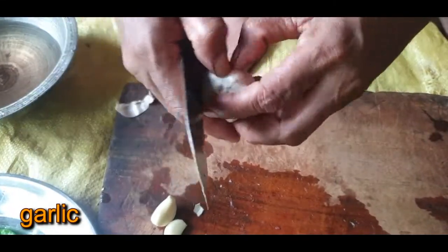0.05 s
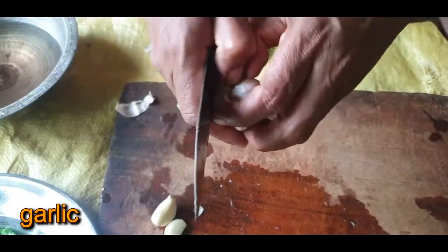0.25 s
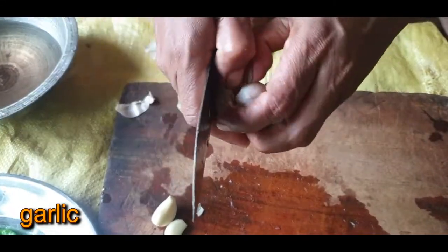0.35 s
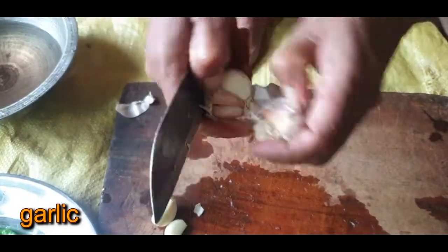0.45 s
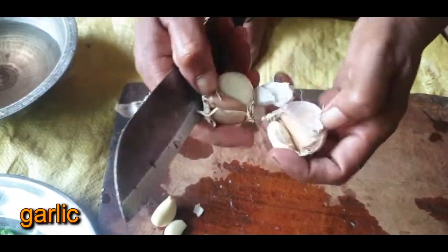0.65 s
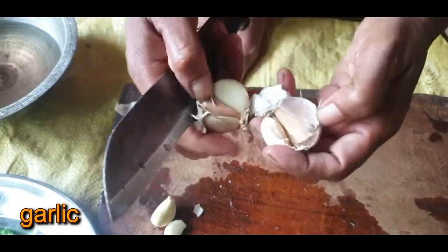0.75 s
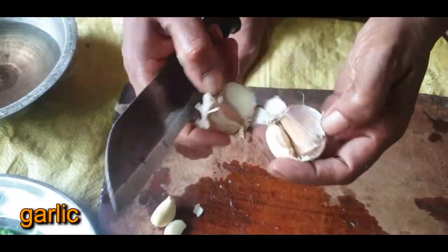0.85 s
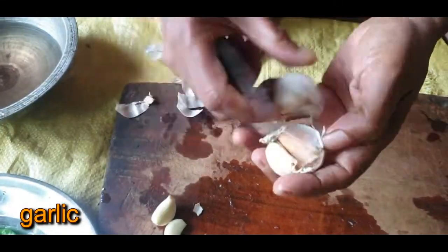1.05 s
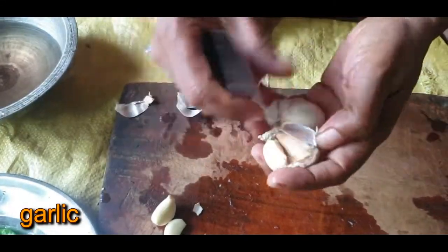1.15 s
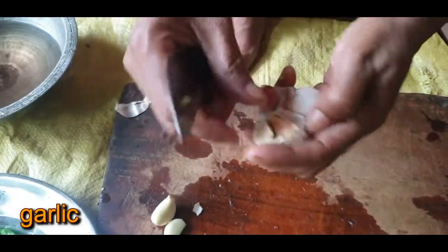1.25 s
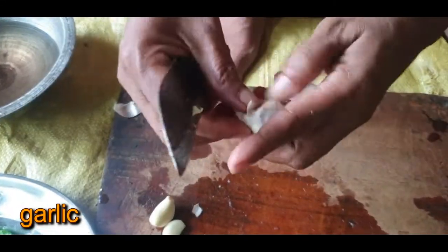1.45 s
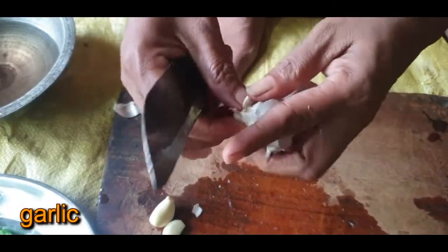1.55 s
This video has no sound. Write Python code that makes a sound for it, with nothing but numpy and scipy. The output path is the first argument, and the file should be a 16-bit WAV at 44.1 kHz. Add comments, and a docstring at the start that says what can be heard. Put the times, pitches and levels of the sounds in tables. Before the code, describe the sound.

A garlic bulb is prised apart by hand, close by in a small quiet kitchen. A few dry snaps build to a sharp, tearing crackle, then fingers softly rub and tick on the papery skin.

```python
"""A garlic bulb is prised apart by hand over a chopping board, close by in a small kitchen.
Dry skin and stem snap a few times, then the bulb gives way: fibres tear in a crackle and the woody
core knocks. Before and after, fingers rub and tick on the papery skin. The board and hands scatter
each crack, the room rings briefly, and a low hum and faint tones lie underneath."""
import sys
import numpy as np
from scipy import signal
from scipy.fft import rfft, irfft
from scipy.io import wavfile
from scipy.ndimage import uniform_filter1d

SR = 44100
rng = np.random.default_rng(int(sys.argv[2]) if len(sys.argv) > 2 else 0)


def dump_mix(stems):
    """Bounce the given channels to the path in sys.argv[1] as a 16-bit WAV at rate SR."""
    frames = np.atleast_2d(stems).T  # one column per channel
    limited = np.clip(frames, -1, 1)  # hard clip at full scale
    pcm = np.round(limited * 32767).astype(np.int16)
    wavfile.write(sys.argv[1], SR, pcm)


N = 70560
T = np.arange(N) / SR

# Tone colour of the kitchen air and of the low rumble. Each row: frequency in Hz, level in dB.
AIR_COLOUR = [(20, -45), (45, -2), (100, -2), (250, -12), (550, -12.5), (900, -21), (1800, -20.5),
              (3800, -15.5), (6000, -23), (7700, -32), (11500, -21), (16000, -36)]
RUMBLE_COLOUR = [(20, -39), (48, 2), (110, -5), (175, -3.5), (260, -13.5), (600, -24.5), (1500, -53),
                 (16000, -104)]
# How wide the air sounds. Each row: frequency in Hz, level of the sides against the middle in dB.
AIR_WIDTH = [(80, -10.5), (400, -3.5), (3000, 1.5)]
# Faint wavering tones. Each row: pitch in Hz, width in Hz, relative level in dB.
FAINT_TONES = [(560, 85, -2), (906, 99, -3.5), (1052, 110, -7.5), (1419, 54, -5)]
# How the hum, the tones and a thin whistle rise and fall. Each row: time in seconds, level in dB.
HUM_LEVELS = [(0, -54), (.12, -62.5), (.23, -55.5), (.33, -59.5), (.48, -57.5), (.58, -69), (.68, -62.5),
              (.93, -64), (1.01, -64.5), (1.13, -57.5), (1.42, -82.5), (1.53, -69)]
TONE_LEVELS = [(0, -86), (.12, -66.5), (.35, -69), (.7, -94), (1.1, -82.5), (1.6, -75)]
WHISTLE_LEVELS = [(0, -74), (.1, -60.5), (.18, -74), (.63, -64), (.72, -82), (.9, -65), (.98, -86)]
# Skin sliding under the fingers. Each row: peak time, rise and fall in seconds, level in dB,
# treble in dB, centre of the rasp in Hz.
FINGER_RUBS = [(.003, 0.023, 0.027, -47.5, -9.5, 4830), (0.1, 0.02, 0.031, -45.5, -1.5, 6500),
               (0.211, 0.04, 0.093, -50, 2, 6300), (.82, 0.9, 0.15, -60.5, -7, 3670),
               (0.997, 0.041, 0.03, -44, 3, 5800), (1.051, 0.0074, 0.011, -54.5, 11, 5100),
               (1.176, 0.018, 0.064, -55, 5, 5370), (1.251, 0.011, 0.028, -52.5, 5, 8700),
               (1.271, 0.017, 0.018, -43.5, -6.5, 10800), (1.296, 0.017, 0.011, -43.5, -3, 9250),
               (1.346, 0.041, 0.034, -44.5, -2.5, 3900), (1.486, 0.022, 0.021, -45, -2, 4700),
               (1.516, 0.014, 0.015, -49, -1, 5270), (1.59, 0.036, 0.1, -50, 2.5, 6260)]
# Small ticks of dry skin. Each row: start in seconds, level in dB, treble in dB.
SKIN_TICKS = [(.0048, -41.5, 5), (.0098, -42, 0), (0.036, -52, 10), (0.0732, -41.5, 2.5), (0.099, -43, 11),
              (0.267, -40, -8), (0.8429, -55.5, 4), (1.0495, -56, 8), (1.1537, -53, 5), (1.25, -46.5, 13),
              (1.2732, -49, 15), (1.298, -50.5, 18), (1.433, -55.5, 9.5), (1.4832, -52, -3),
              (1.5399, -43, 5.5), (1.586, -40.5, 7)]
# Loud snaps of stem and skin. Each row: start in seconds, level, bass and treble in dB, splinter fade
# in milliseconds, left over right in dB, ring of the broken piece in Hz, its boost in dB, top end in dB.
STEM_SNAPS = [(.2424, -15, 5, 4, 1, 1.5, 3650, 8.5, 2.5), (.3626, -7, -4, -14.5, 0.09, -1, 4050, 6, 3),
              (.3924, -17, 0, 3.5, 0.51, 0.5, 5960, 12.5, -12),
              (.4122, -15.5, -5, -6.5, 0.15, -1, 4040, 7.5, -6),
              (.4322, -22.5, -5, 10, 0.29, 3, 6400, 9.5, 2), (.4515, -29, 1, -5, 0.57, -3.5, 5780, 14, -3),
              (.5065, -35.5, 1, 2, 0.8, 7, 5570, -13, 14), (.5199, -27.5, -15, 2.5, 0.47, 1, 6260, -6, 10),
              (.5272, -26, -7, -10, 0.5, 10, 3600, 7, 13), (.5358, -7.5, -3, -12, 0.56, -1, 3040, 7, 11),
              (.5375, -11, -10.5, -4.5, 0.4, 1, 2300, 18, -17),
              (.5403, -4, -5.5, -11.5, 0.45, 0.5, 3500, 6, -0.5),
              (.5484, -17.5, 0, -21, .6, -9, 5600, 8, 14), (.5537, -25.5, -6, 2, .4, 5, 5260, 10, 17),
              (.5653, -18, 12, -0.5, 0.35, 3.5, 6600, 8, -6)]
# Runs of tearing fibres. Each row: peak time, rise and fall in seconds, level, bass and treble in dB.
FIBRE_TEARS = [(0.243, 0.011, 0.043, -36.5, 10.5, -1.5), (.364, 0.0085, 0.033, -38, 3, -2),
               (0.497, 0.0031, 0.017, -32.5, -14, -10.5), (0.525, 0.011, 0.022, -23.5, -7, -3),
               (0.543, 0.021, 0.023, -25.5, 2.5, -8.5), (0.565, 0.036, 0.02, -31.5, 2, 4),
               (0.611, 0.027, 0.011, -35.5, -23, -6)]
# Tone colour of rubbed skin and of a crack in the bulb. Each row: frequency in Hz, level in dB.
SKIN_COLOUR = [(200, -13), (900, -13.5), (2000, -8.5), (3700, -5), (5700, 1.5), (7700, -5.5), (10500, 3),
               (14000, -1.5), (16000, 4)]
CRACK_COLOUR = [(150, -37.5), (620, -35), (1200, -22), (2700, -11.5), (3400, -5), (4500, -0.5), (6200, -3),
                (7900, -9.5), (9200, -4.5), (10800, 0), (14000, -0.5), (16000, -10.5)]
# How the garlic's sound leans to one side. Each row: frequency in Hz, left over right in dB.
SIDE_LEAN = [(1000, 2), (2400, 1), (3400, 8), (4500, -4.5), (8000, 0), (15000, 0)]
# Hollow knocks of the woody core. Each row: start in seconds, level in dB.
CORE_KNOCKS = [(.537, -33.5), (.5645, -27.5)]
# The notes the core rings at. Each row: pitch in Hz, relative level in dB, seconds to fade by 60 dB.
CORE_NOTES = [(348, -16, 0.022), (970, -4, 0.016), (1563, 4, 0.0081), (1870, 1, 0.0069),
              (2196, 7.5, 0.0093)]

BASS_HZ, TREBLE_HZ, TOP_END_HZ = 2700, 7300, 13300
SPLINTER_SHARE, SCATTER_DB, SCATTER_FADE_S, SCATTER_DELAY_S = 0.36, -4, 0.0026, 0.0005
RIGHT_LAG_MS, LAG_SPREAD_MS, SKIN_PAN_DB = 0.056, 0.03, 1.5
OPPOSITE_SIDES = np.array([[1], [-1]])


def gain(db):
    """Turn decibels into a number to multiply by."""
    return 10 ** (np.asarray(db) / 20)


def unit(x):
    """Scale a sound to an average power of 1."""
    return x / np.sqrt(np.mean(x ** 2))


def pan(db):
    """Left and right gains that make the left louder by db."""
    return gain(OPPOSITE_SIDES * db / 2)


def colour(points, hz):
    """Read a table's decibels at the given frequencies."""
    table_hz, db = np.array(points).T
    return np.interp(np.log(hz + 1), np.log(table_hz), db)


def bass_treble(hz, bass_db, treble_db):
    """Decibels added by a bass and a treble control."""
    return bass_db / (1 + (hz / BASS_HZ) ** 6) + treble_db * (1 - 1 / (1 + (hz / TREBLE_HZ) ** 8))


def bump(hz, centre_hz, width_hz):
    """The shape of a resonance, 1 at its centre."""
    return 1 / (1 + (2 * (hz - centre_hz) / width_hz) ** 2)


def shape(x, db):
    """Boost or cut each frequency so that any ringing follows the sound (a minimum-phase filter)."""
    cepstrum = irfft(db * np.log(10) / 20)
    half = cepstrum.shape[-1] // 2
    cepstrum[..., 1:half] *= 2
    cepstrum[..., half + 1:] = 0
    return irfft(rfft(x) * np.exp(rfft(cepstrum)))


def garlic_tone(x, points, bass_db, treble_db):
    """Give a plain sound the garlic's tone colour and its lean to either side."""
    hz = np.fft.rfftfreq(x.shape[-1], 1 / SR)
    db = colour(points, hz)
    db -= 10 * np.log10(np.mean(gain(db) ** 2))
    lean_db = OPPOSITE_SIDES * colour(SIDE_LEAN, hz) / 2
    return shape(x, db + bass_treble(hz, bass_db, treble_db) + lean_db)


def add(out, x, start_s):
    """Mix a short sound in at the given time."""
    i = max(0, min(int(start_s * SR), N - 1))
    out[:, i:i + x.shape[1]] += x[:, :N - i]


def grains(per_s, spread_db):
    """A stream of tiny breaks of uneven size, partly alike on both sides."""
    sizes = gain(spread_db * np.minimum(rng.exponential(size=N), 5))
    happens = rng.random(N) < per_s / SR
    x = sizes * happens * (rng.standard_normal((2, N)) + 0.46 * rng.standard_normal(N))
    return x / np.sqrt(uniform_filter1d(x ** 2, size=500, axis=1) + 1e-9)


def swell(peak_s, rise_s, fall_s):
    """Pressure that builds to a peak and lets go."""
    return np.exp(-2 * (abs(T - peak_s) / np.where(T < peak_s, rise_s, fall_s)) ** 1.44)


def background():
    """Room air, a wavering hum with its rumble, faint tones and a whistle, all filtered noise."""
    hz = np.fft.rfftfreq(N, 1 / SR)
    noise = lambda weights: unit(irfft(rfft(rng.standard_normal(N)) * weights))
    narrow = lambda centre_hz, width_hz: noise(bump(hz, centre_hz, width_hz))
    broad = lambda points: noise(gain(colour(points, hz)))
    level = lambda rows: gain(np.interp(T, *np.array(rows).T))
    middle = broad(AIR_COLOUR)
    sides = shape(broad(AIR_COLOUR), colour(AIR_WIDTH, hz)) * OPPOSITE_SIDES
    air = gain(-63.5) * (middle + sides)
    hum = (narrow(centre_hz=77, width_hz=10) + gain(-1.5) * broad(RUMBLE_COLOUR)) * level(HUM_LEVELS)
    tones = sum(gain(db) * narrow(pitch, width) for pitch, width, db in FAINT_TONES) * level(TONE_LEVELS)
    whistle = narrow(centre_hz=2356, width_hz=106) * level(WHISTLE_LEVELS)
    return (air + hum + tones + whistle) * pan(db=3.5)


def rubbing(rasp_db=8, rasp_width_hz=1780):
    """Papery skin rustles under the fingers; each stroke rasps in its own narrow band."""
    flakes = grains(per_s=11000, spread_db=3.5)
    hz = np.fft.rfftfreq(N, 1 / SR)
    strokes = np.zeros((2, N))
    for peak_s, rise_s, fall_s, db, treble_db, rasp_hz in FINGER_RUBS:
        tone_db = bass_treble(hz, 0, treble_db) + rasp_db * bump(hz, rasp_hz, rasp_width_hz)
        strokes += shape(flakes * swell(peak_s, rise_s, fall_s) * gain(db), tone_db)
    return pan(SKIN_PAN_DB) * garlic_tone(strokes, SKIN_COLOUR, 0, 0)


def add_crack(out, start_s, db, bass_db, treble_db, splinter_ms, pan_db, ring_hz, ring_db, top_db):
    """Mix in one break: a sharp click, a spray of splinters, and scatter off the hands and board."""
    size, lead = 1024, 128  # in samples
    t, hz = np.arange(size) / SR, np.fft.rfftfreq(size, 1 / SR)

    def burst(fade):
        noise = rng.standard_normal((2, size)) + 0.38 * rng.standard_normal(size)  # sides partly alike
        return unit(noise * fade) / np.sqrt(size)

    def flatten(spectrum):
        return spectrum / np.sqrt(uniform_filter1d(abs(spectrum) ** 2, size=90, axis=1))

    direct = np.sqrt(SPLINTER_SHARE) * burst(np.exp(-1000 * t / splinter_ms))
    direct[:, 0] += np.sqrt(1 - SPLINTER_SHARE)  # the click
    scatter = burst(np.exp(-t / SCATTER_FADE_S) * (t > SCATTER_DELAY_S))
    spectrum = flatten(flatten(rfft(direct)) + gain(SCATTER_DB) * flatten(rfft(scatter)))
    # Each piece breaks at its own place between the two sides.
    lag_ms = RIGHT_LAG_MS + LAG_SPREAD_MS * rng.standard_normal()
    spectrum[1] *= np.exp(-2j * np.pi * hz * lag_ms / 1000)
    crack = np.roll(irfft(spectrum), lead, axis=1)
    top_end = top_db * (1 - 1 / (1 + (hz / TOP_END_HZ) ** 20))
    crack = shape(crack, ring_db * bump(hz, ring_hz, width_hz=1150) + top_end)
    crack = garlic_tone(crack, CRACK_COLOUR, bass_db, treble_db)
    strength = gain(db) * np.sqrt(0.001 * SR)  # one millisecond's worth of energy at this level
    add(out, crack * pan(pan_db) * strength, start_s - lead / SR)


def ticks():
    """The dry skin gives small cracks that all ring in the same band."""
    out = np.zeros((2, N))
    for start_s, db, treble_db in SKIN_TICKS:
        add_crack(out, start_s, db, bass_db=0, treble_db=treble_db, splinter_ms=0.35,
                  pan_db=SKIN_PAN_DB, ring_hz=4230, ring_db=6.5, top_db=0)
    return out


def snaps():
    """Stem and skin break loudly, each piece with its own tone."""
    out = np.zeros((2, N))
    for row in STEM_SNAPS:
        add_crack(out, *row)
    return out


def tearing():
    """Fibres part in quick runs as the cloves separate."""
    fibres = grains(per_s=5200, spread_db=3)
    out = np.zeros((2, N))
    for peak_s, rise_s, fall_s, db, bass_db, treble_db in FIBRE_TEARS:
        run = fibres * swell(peak_s, rise_s, fall_s) * gain(db)
        out += garlic_tone(run, CRACK_COLOUR, bass_db, treble_db)
    return out


def knocks(attack_s=0.00089):
    """The woody core rings briefly when it splits."""
    out, t = np.zeros((2, N)), T[:N // 16]
    notes = sum(gain(db - 60 * t / fade_s) * np.sin(2 * np.pi * hz * t + rng.uniform(-2.16, 1, (2, 1)))
                for hz, db, fade_s in CORE_NOTES)
    knock = notes * np.minimum(t / attack_s, 1) * pan(db=1)
    for start_s, db in CORE_KNOCKS:
        add(out, knock * gain(db), start_s)
    return out


def room_echo(x, fade_s=0.24, onset_s=0.0068):
    """The kitchen's reflections blur into a short ring, different on each side."""
    t = T[:N // 2]
    build_up = 1 - np.exp(-(t / onset_s) ** 4)
    tail = rng.standard_normal((2, len(t))) * gain(-60 * t / fade_s) * build_up
    echo = signal.fftconvolve(x, unit(tail) / np.sqrt(len(t)), axes=1)[:, :N]
    hz = np.fft.rfftfreq(N, 1 / SR)
    return gain(-12) * shape(echo, bass_treble(hz, bass_db=3.5, treble_db=-1.5))


def scene():
    """The garlic, its reflections and the quiet kitchen."""
    garlic = snaps() + ticks() + knocks() + tearing() + rubbing()
    return garlic + room_echo(garlic) + background()


def record(dry):
    """The recorder rounds off the highest peaks and cuts the very top of the treble."""
    top_cut = signal.ellip(10, .2, 80, 15750, fs=SR, output="sos")
    return signal.sosfilt(top_cut, np.tanh(dry))


dry = scene()
out = record(dry)
dump_mix(out)
```